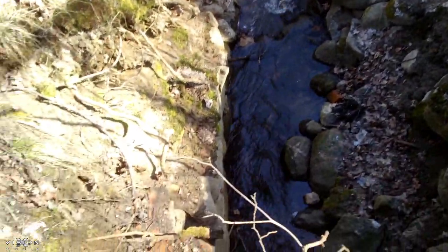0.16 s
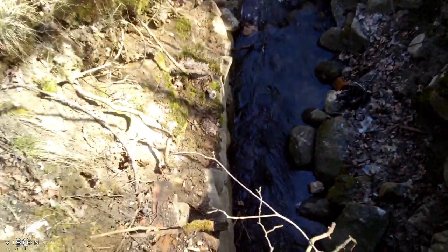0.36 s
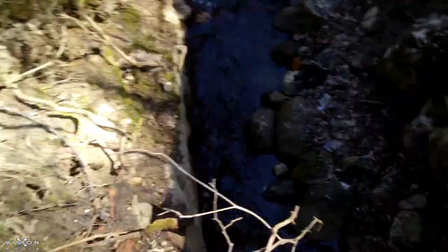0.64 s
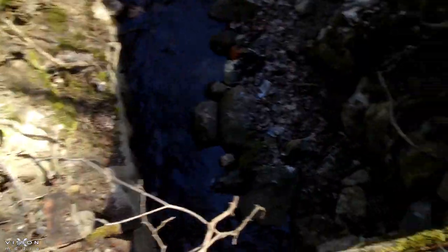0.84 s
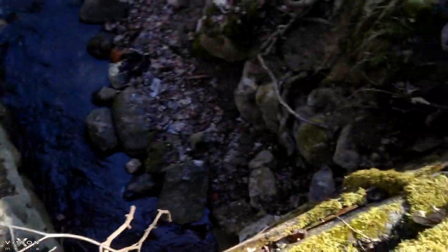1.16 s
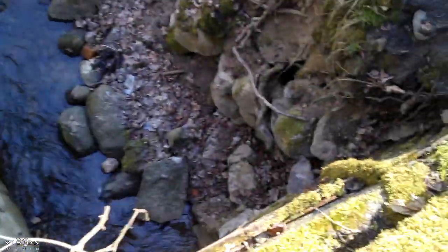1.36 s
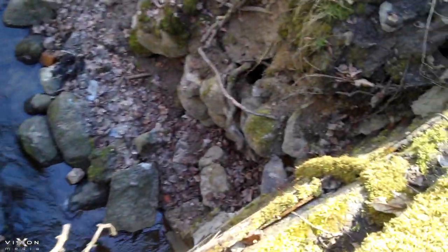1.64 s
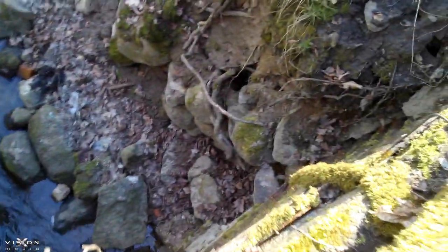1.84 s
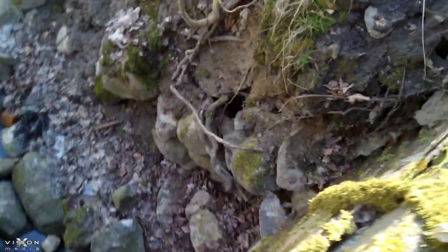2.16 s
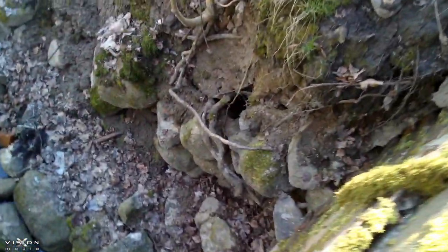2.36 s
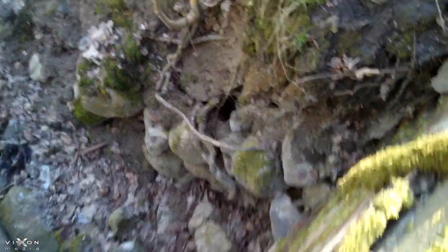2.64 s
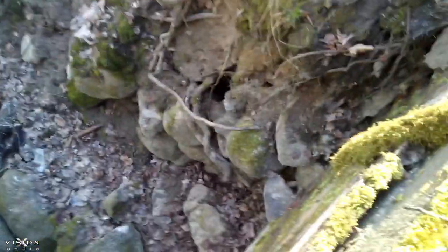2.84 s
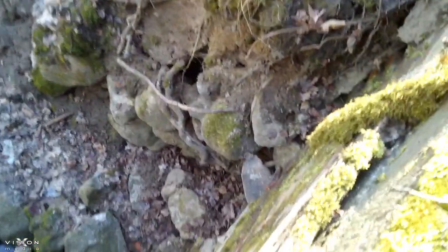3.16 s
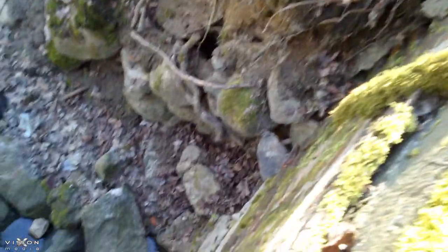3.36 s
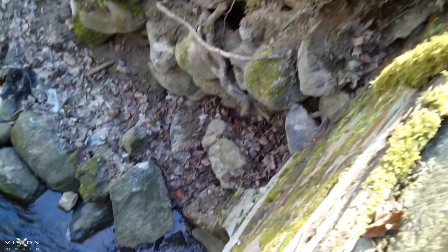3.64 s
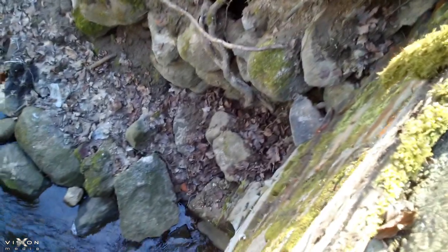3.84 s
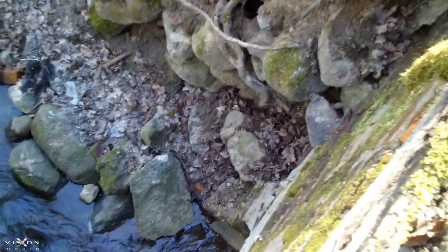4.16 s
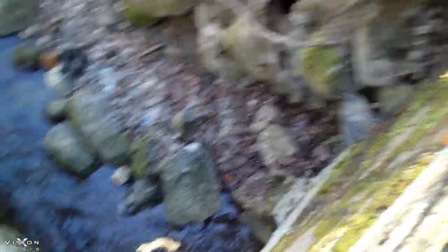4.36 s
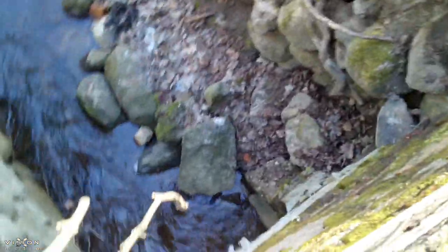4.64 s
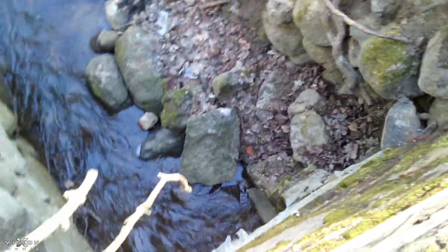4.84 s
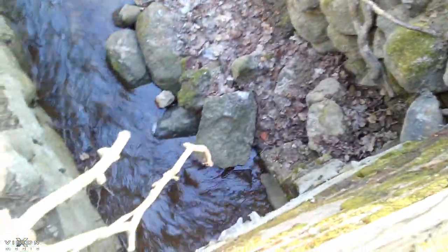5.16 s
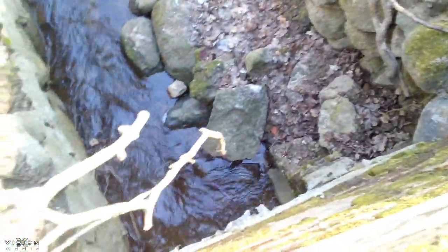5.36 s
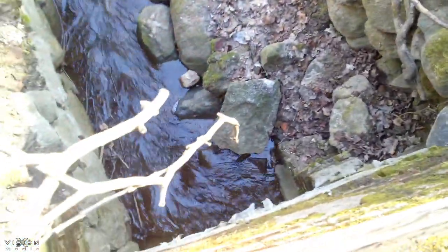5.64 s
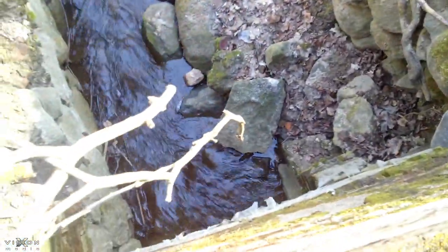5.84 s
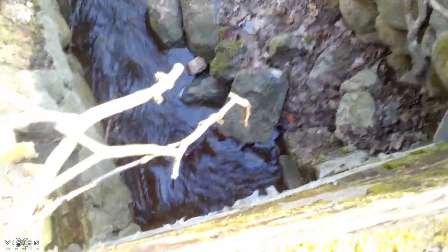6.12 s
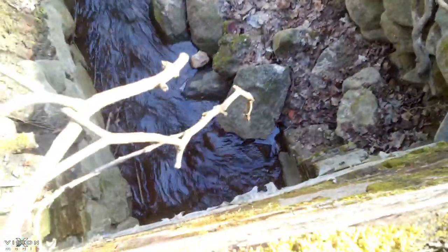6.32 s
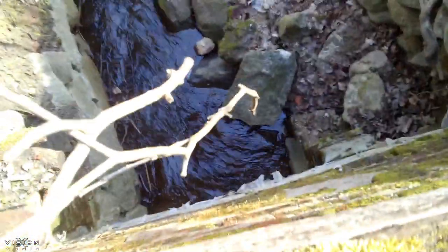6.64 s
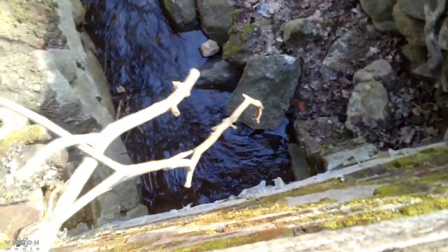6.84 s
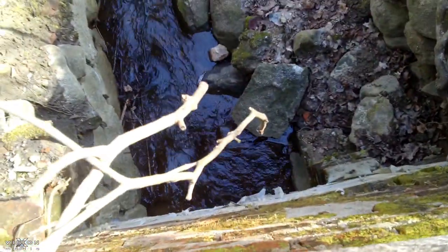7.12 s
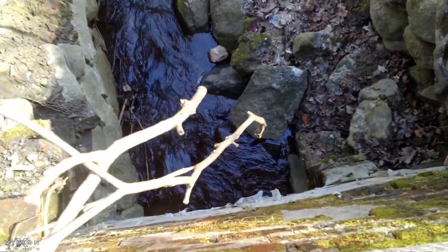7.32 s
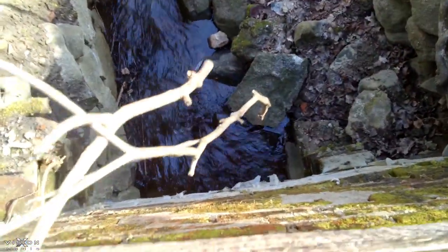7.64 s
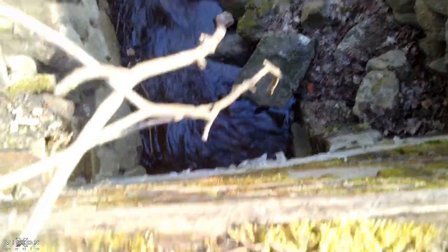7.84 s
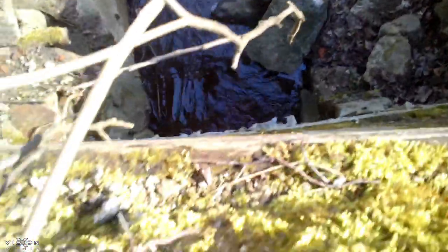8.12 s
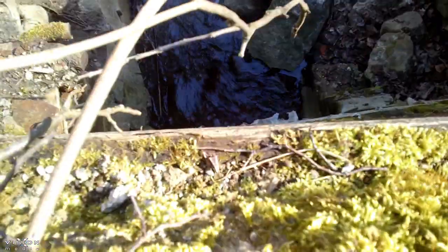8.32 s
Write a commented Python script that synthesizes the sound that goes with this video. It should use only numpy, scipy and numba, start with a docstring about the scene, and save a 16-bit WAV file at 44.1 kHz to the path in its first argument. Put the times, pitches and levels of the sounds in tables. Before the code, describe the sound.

A small brook babbles continuously over stones, heard close from above in a rocky gully with a faint, short echo. Thousands of small ringing bubbles blur into a bright midrange rush, dotted with clear plinks that rise in pitch. Around 0.7 seconds a wavelet slops with a rounder glug. From 1.7 to 2.7 the water is fuller and brighter, with fizzing spray surging strongest at 2.4 and sharp drops on stone. Low puffs of air and soft dull bumps touch the hand-held microphone near 1.5 and mostly from 2.8 to 3.8, strongest about 3.05. The flow thins between 4.5 and 5.2, quietest near 4.9, then returns by 5.5 with deeper hollow gurgles. At 6.55 a hard, dry click cracks out; the level dips briefly and recovers by about 6.95. Clear glugs sound near 7.2, 7.6 and 7.9; the babble swells near 7.75, eases at 8.1 and continues to the end at about 8.5.

```python
"""Small brook in a forest gully

A small brook runs over rocks, heard from the bank above it.
Bubbles in the riffle are thousands of dying sines; trickles add runs of clearer ones, over a blur of noise.
Tiny bubbles and noise make the spray fizz; large, low bubbles gurgle in a hollow between stones.
Puffs of low noise and soft, dull tones are air and bumps reaching the hand-held microphone.
There is one sharp click of short tones and noise, after which the level dips briefly."""
import sys
import numpy as np
from scipy import signal
from scipy.fft import rfft, irfft, next_fast_len
from scipy.io import wavfile
from numba import njit

SR = 44100
rng = np.random.default_rng(int(sys.argv[2]) if len(sys.argv) > 2 else 0)


def transcribe(u):
    """Save the signal u as a 16-bit wav file named by the first command-line argument.

    u: samples, shape (n,) or (channels, n), limited to [-1, 1]; the rate is SR.
    q: integer samples, one column per channel.
    """
    v = np.clip(np.atleast_2d(u).T, -1, 1)
    q = np.round(v * 32767).astype(np.int16)
    wavfile.write(sys.argv[1], SR, q)


N = 373968
TIME = np.arange(N) / SR

# flow of the riffle: t/s, babble level/dB,
# brightness/dB (added to the upper babble and the spray that follows it)
FLOW = [(0, -26.5, 5), (0.35, -27.5, 4.5), (0.75, -26, 4.5), (1.05, -27, 3), (1.6, -25, 3.0),
        (2.2, -24.5, 6.5), (2.9, -25.5, 7.5), (3.6, -25.5, 6), (4.25, -27, 7), (4.6, -32.5, 4.5),
        (4.78, -33, 1.5), (4.92, -38, 6.5), (5.17, -31, 2), (5.4, -26.5, 2.5), (5.95, -25.5, 2.5),
        (6.4, -28.5, 4.5), (7.2, -26, 2), (7.75, -24, 3.5), (8.12, -31, 8.5), (8.48, -27, 4)]
# the current is never even: each half of the babble wavers on its own
WAVER_DB, WAVER_PER_S = 0.92, 16
# a trickle's run of bubbles: typical gap, growth from one to the next, random pitch step
TRICKLE_GAP_S, TRICKLE_GROWTH_DB, TRICKLE_STEP_OCT = 0.011, 1, 0.1315
# wavelets slop over and trap big bubbles: t/s, level added to the lower babble/dB
SLOSHES = [(0.718, -22), (0.8, -22.5), (1.68, -43), (2.125, -25), (3.745, -19.5), (5.07, -42), (5.425, -25),
           (5.735, -25), (5.825, -23), (5.98, -23), (6.935, -42), (7.165, -26)]
SLOSH_RISE_S, SLOSH_HOLD_S, SLOSH_DECAY_S = 0.004, 0.011, 0.019
# waves break over a rock and throw spray: t/s, spray level/dB, decay/s
SURGES = [(0.548, -27, 0.067), (1.74, -35.5, 0.22), (1.88, -27, 0.097), (2.139, -23.5, 0.15),
          (2.407, -19.5, 0.21), (2.69, -27.5, 0.024)]
SURGE_RISE_S, SURGE_BABBLE_DB = 0.034, 6  # babble gain stirred up, relative to the surge's spray gain
SPRAY_SHARE_DB = -16.5  # steady spray gain, relative to the upper babble gain
# the hollow between stones: t/s, gurgle level/dB, burble level/dB
HOLLOW = [(0, -46, -36.5), (0.35, -56.5, -46.5), (0.65, -49, -39), (2.2, -47, -37.5), (3.3, -40.5, -39),
          (4.25, -48.5, -43), (4.48, -45.5, -54), (4.75, -60, -51), (5.3, -49.5, -42), (5.42, -42.5, -40),
          (5.7, -43.5, -35.5), (6.35, -40, -55), (6.5, -38.5, -42), (6.64, -47, -59), (6.78, -46, -50),
          (6.83, -42, -51), (7.1, -46.5, -47), (7.42, -50.5, -61), (7.56, -40.5, -53), (7.9, -40.5, -39),
          (8.48, -41.5, -48)]
# big air pockets in the hollow: t/s, level/dB, f/Hz
GLUGS = [(0.574, -15.5, 570), (0.724, -10.5, 930), (2.202, -22, 433), (3.196, -26.5, 320),
         (3.285, -23, 545), (3.344, -24.5, 566), (3.378, -30, 332), (4.511, -32, 350), (5.393, -32, 350),
         (5.418, -28, 315), (5.702, -26, 313), (5.737, -25, 357), (5.93, -21, 580), (5.968, -32, 342),
         (6.227, -16, 346), (6.462, -29, 365), (6.806, -28, 325), (6.931, -24, 360), (7.038, -27, 387),
         (7.236, -14, 780), (7.486, -37, 237), (7.531, -32, 400), (7.582, -11, 770), (7.693, -25, 356),
         (7.745, -23.5, 336), (7.899, -24, 362), (7.908, -12, 874), (7.97, -23, 389), (8.228, -26, 338)]
# ring time at this pitch; it shortens with this power of the pitch
GLUG_T60_S, GLUG_PITCH_HZ, GLUG_DAMPING = 0.095, 350, 1.1
# single near bubbles: t/s, level/dB, f/Hz, splash level relative to the table's bubble level/dB
PLINKS = [(0.2, -14, 1135, 11.5), (0.454, -11, 1900, -2), (0.484, -8, 3200, -1.5), (0.729, -10, 1027, -4),
          (0.735, -13, 1900, -3), (0.754, -10, 2800, -2), (0.875, -7, 2170, -7), (1.097, -9, 1500, 5),
          (1.18, -9.5, 2250, -3), (1.614, -7, 2570, -2), (1.695, -9, 1370, 0), (1.732, -1, 2210, -4),
          (1.857, -3.5, 2740, -6), (1.902, -6.5, 2100, -4), (2.018, -7, 1730, -8), (2.128, -5, 1760, 1),
          (2.182, 0, 2100, -2), (2.313, -3.5, 2350, -5), (2.787, -3, 1950, -3), (3.039, -2.5, 2420, -10),
          (3.131, -7, 2460, 5), (3.311, -6.5, 2100, -11), (3.359, -3, 2350, -4), (3.605, -4.5, 2070, -11),
          (3.754, -13.5, 970, 1), (3.847, -6, 1750, -3), (4.108, -10, 2720, -12), (4.271, -5.5, 1694, -17),
          (4.933, -19, 1870, -5), (5.077, -13, 1240, -3), (5.312, -12, 2540, -8), (5.347, -14.5, 996, 11),
          (5.435, -16.5, 1130, 6), (5.535, -12, 1800, -14), (5.691, -8, 1720, -3), (5.883, -12, 1740, 8.5),
          (5.997, -10, 1244, -6), (6.243, -9, 2770, -5), (6.427, -11, 2580, -6), (7.055, -8, 1650, 0),
          (7.174, -17, 1080, 10), (7.277, -11.5, 3090, -3), (7.355, -6.5, 1980, -2), (7.481, -10, 2850, -4),
          (7.505, -8.5, 1970, -5), (7.731, -5.5, 2300, -3), (7.776, -5, 2930, -11), (7.95, -8, 1630, -7),
          (8.136, -11, 2960, -20), (8.296, -13, 1130, -13), (8.369, -6, 1850, -1.5),
          (8.425, -12.5, 1800, -6)]
# drops slapping on stone: t/s, level/dB
DROPS = [(1.8563, -7), (2.145, -2), (2.4, -0.5), (5.4248, -10.5), (7.0555, -13.5), (7.498, -14),
         (7.8495, -11)]
# tones of the sharp click: t/s, level/dB, f/Hz, time to fall by 60 dB/s
CLICK = [(6.5463, 10.5, 2970, 0.0054), (6.5478, 10, 1950, 0.0088), (6.548, -3, 1020, 0.02),
         (6.548, -17, 620, 0.058), (6.549, -6, 5000, 0.012)]
# low rumble: t/s, level/dB
RUMBLING = [(0, -49), (0.45, -47), (1.05, -74), (1.5, -43.5), (1.9, -59), (2.35, -51), (2.6, -66),
            (2.95, -41.5), (3.8, -43), (4.7, -69.5), (5.2, -72.5), (5.6, -50), (6.1, -46), (7.0, -59),
            (7.5, -56), (7.85, -47.5), (8.25, -69), (8.48, -59)]
# gusts on the microphone: t/s, length/s, level/dB
GUSTS = [(1.475, 0.113, -31), (2.777, 0.033, -28), (2.887, 0.17, -27.5), (3.185, 0.15, -32),
         (3.346, 0.35, -34), (3.694, 0.12, -28.5), (3.818, 0.099, -37), (5.802, 0.02, -45),
         (5.9, 0.23, -49.5), (7.495, 0.037, -54)]
GUST_RISE_S, GUST_DECAY_S = 0.034, 0.028
LIGHT_AIR_DB = -10.5  # gain of the faint puffs, relative to the rumble curve
# soft bumps on the microphone: t/s, level/dB, f/Hz
BUMPS = [(1.52, -24, 150), (1.586, -22, 155), (2.797, -13, 192), (2.896, -15, 170), (2.947, -19.5, 173),
         (2.989, -11, 155), (3.046, -3, 185), (3.287, -27, 140), (3.464, -24, 124), (3.701, -23, 163),
         (3.759, -14.5, 149), (3.776, -15, 90), (5.791, -33, 99), (5.807, -19, 108)]
# how the microphone is turned: t/s, shaded f/Hz, lift of the top/dB
AIM = [(0, 5900, -3.5), (0.7, 4820, -2), (1.4, 5080, -2), (1.8, 4020, -1), (2.7, 3780, -1),
       (4.2, 3740, -2.5), (5.3, 4590, 4.5), (6.5, 4520, 2), (7.2, 4440, 2.5), (8.48, 5220, -0.5)]
# the level dips after the click
DIP_START_S, DIP_FALL_S, DIP_HOLD_S, DIP_RECOVER_S = 6.56, 0.08, 0.13, 0.18
DIP_DB = -8.5
CUTOFF_HZ = 6950
# colour of the riffle's babble: f/Hz, level/dB
BABBLE = [(380, -36.5), (600, -17.5), (780, -5), (1050, -3), (1450, -3), (1800, 0.74), (2300, 0),
          (2900, -3), (3400, -5.5), (3850, -8.5), (4250, -17.5), (4900, -33.5)]
# colour of the spray: f/Hz, level/dB
SPRAY = [(3000, -2.5), (3900, -10), (4900, -6), (5900, -9), (6600, -15), (7200, -38.5)]
# colour of the large bubbles in the hollow: f/Hz, level/dB
GURGLE = [(180, -8), (290, -3.5), (340, 4.5), (420, 4), (500, -12.5), (700, -33)]
# colour of the smaller bubbles in the hollow: f/Hz, level/dB
BURBLE = [(380, -3.5), (480, -7.5), (600, -5), (700, -6.5), (850, -33.5)]
# colour of the low rumble: f/Hz, level/dB
RUMBLE = [(15, -5), (40, -15), (68, 5.5), (90, -11), (140, -34.5), (300, -36.5)]
# colour of the puffs of air: f/Hz, level/dB
BUFFET = [(15, -13.5), (45, -7.5), (150, 3.5), (240, -2), (350, -13), (700, -42.5)]


def brook():
    """The flow drives babble and spray together; surges add to both, sloshes to the lower babble."""
    babble_db, bright_db = in_time(FLOW)
    lower = from_db(babble_db + WAVER_DB * drift(WAVER_PER_S))
    upper = from_db(babble_db + bright_db + WAVER_DB * drift(WAVER_PER_S))
    surge = surges()
    stirred = surge * from_db(SURGE_BABBLE_DB)
    churn = stirred ** 2 / (stirred ** 2 + upper ** 2)
    lower_extra = stirred * from_db(-bright_db) + sloshes()
    # hypot adds the powers of two gains
    babble = riffle(np.hypot(lower, lower_extra), np.hypot(upper, stirred), churn)
    fizz = spray(np.hypot(upper * from_db(SPRAY_SHARE_DB), surge))
    return babble + fizz + hollow(*in_time(HOLLOW)) + plinks() + drops()


def riffle(lower_gain, upper_gain, churn):
    """Ringing bubbles and slaps stand out of the blur of farther water; churning turns them to froth."""
    near = bubbles(per_s=2000, low_hz=500, high_hz=4445, cycles=33, loudness_db=2.6,
                   rise=0.098, onset_cycles=1.0, count=40000)
    runs = trickles(per_s=60, low_hz=1000, high_hz=3700, cycles=56, count=1200, size=4)
    ringing = coloured(near + from_db(-4) * runs, BABBLE)
    slaps = coloured(splashes(per_s=300, loudness_db=0.8, decay_s=0.0013, count=6000), BABBLE)
    far, froth = (coloured(white, BABBLE) for white in rng.standard_normal((2, N)))
    water = rms_one(ringing + from_db(-3.5) * slaps + from_db(-5.5) * far)
    water = np.sqrt(1 - churn) * water + np.sqrt(churn) * froth
    # big bubbles carry the lower babble, small ones the upper
    lower = signal.sosfiltfilt(signal.butter(3, 1600, fs=SR, output="sos"), water)
    upper = water - lower
    return lower_gain * from_db(0.3) * rms_one(lower) + upper_gain * from_db(-0.99) * rms_one(upper)


def trickles(per_s, low_hz, high_hz, cycles, count, size):
    """Threads of water shed linked runs of round, clear bubbles; rms 1."""
    when, chance, pitch = rng.random((count, 3)).T[:, :, None]
    gap, step, strength = rng.standard_normal((count, size, 3)).T.swapaxes(1, 2)
    s = when * N / SR + np.cumsum(TRICKLE_GAP_S * np.exp(0.5 * gap), axis=1)
    # the pitch wanders from each bubble to the next
    hz = low_hz * (high_hz / low_hz) ** pitch * 2 ** (TRICKLE_STEP_OCT * np.cumsum(step, axis=1))
    height = from_db(2 * strength + TRICKLE_GROWTH_DB * np.arange(size)) * np.sqrt(hz / low_hz)
    born = (chance < per_s * N / SR / count) & (s < N / SR)
    return rms_one(rings(s[born], height[born], hz[born], cycles / hz[born], 0.06, 3.5))


def sloshes():
    """Gain of the brief clusters of big bubbles trapped as wavelets slop over."""
    return sum(from_db(db) * swell(s, SLOSH_HOLD_S, SLOSH_RISE_S, SLOSH_DECAY_S) for s, db in SLOSHES)


def surges():
    """Gain of the spray thrown by breaking waves: each swells up and dies away."""
    return sum(from_db(db) * swell(s, 0, SURGE_RISE_S, decay_s) for s, db, decay_s in SURGES)


def spray(gain):
    """Tiny bursting bubbles fizz and droplets tick, blended with hiss."""
    fizz = bubbles(per_s=1900, low_hz=3146, high_hz=7170, cycles=97, loudness_db=4.5,
                   rise=0.023, onset_cycles=0.22, count=40000)
    ticks = splashes(per_s=110, loudness_db=2.8, decay_s=0.0009, count=2000)
    hiss = rng.standard_normal(N)
    mixed = fizz + from_db(2.0) * ticks + from_db(7.0) * hiss
    return gain * from_db(4.0) * coloured(mixed, SPRAY)


def hollow(gurgle_db, burble_db):
    """Large low bubbles gurgle between stones, smaller ones burble, now and then with a clear glug."""
    pockets = bubbles(per_s=115, low_hz=245, high_hz=460, cycles=32, loudness_db=1.4,
                      rise=0.11, onset_cycles=0.6, count=4000)
    smaller = bubbles(per_s=140, low_hz=413.0, high_hz=823, cycles=41, loudness_db=1.0,
                      rise=0.032, onset_cycles=0.9, count=6000)
    s, db, hz = columns(GLUGS)
    t60 = GLUG_T60_S * (GLUG_PITCH_HZ / hz) ** GLUG_DAMPING
    glugs = rings(s, from_db(db + 8.0), hz, t60, 0.17, 3.9)
    gurgle = from_db(gurgle_db + 2.5) * coloured(pockets, GURGLE)
    burble = from_db(burble_db + 0.1) * coloured(smaller, BURBLE)
    return gurgle + burble + glugs


def plinks():
    """A drop lands close by with a small splash and traps a bubble, which rises in pitch."""
    s, db, hz, splash_db = columns(PLINKS)
    splash = band(bursts(s, from_db(db + splash_db), 0.002), [1100, 3200], "band", order=4)
    return splash + rings(s, from_db(db + 3.5), hz, 55 / hz, 0.04, 3.0)


def drops():
    """Each drop on stone is a very short bright splat of noise."""
    s, db = columns(DROPS)
    return band(bursts(s, from_db(db), 0.0011), [4200, 6400], "band", order=3)


def click():
    """A hard tick of short tones with a broad crack and a short scuff around it."""
    s, db, hz, t60 = columns(CLICK)
    grit = rms_one(band(rng.standard_normal(N), [400, 5500], "band", order=2))
    scuff = from_db(-21.0) * swell(s[1], 0, rise_s=0.003, decay_s=0.0076)
    crack = from_db(-9.0) * swell(s[0], 0, rise_s=0.0004, decay_s=0.0018)
    return rings(s, from_db(db), hz, t60, 0.0, 1.0) + (scuff + crack) * grit


def microphone_air(rumble_db):
    """Moving air makes a low rumble and lumpy puffs of noise; bumps are short, dull tones."""
    rumble = from_db(rumble_db + 1.5) * coloured(rng.standard_normal(N), RUMBLE)
    each_gust = [from_db(db) * swell(s, length, GUST_RISE_S, GUST_DECAY_S) for s, length, db in GUSTS]
    gusts = np.max(each_gust, axis=0)
    strength = np.hypot(gusts, from_db(rumble_db + LIGHT_AIR_DB))
    lumps = from_db(2.3 * drift(45))
    puffs = strength * from_db(-2.5) * coloured(rng.standard_normal(N) * lumps, BUFFET)
    s, db, hz = columns(BUMPS)
    bumps = rings(s, from_db(db + 4.0), hz, 4.5 / hz, 0.0, 0.4)
    return rumble + puffs + bumps


def gully(x):
    """The rocky banks send back a faint, short wash of echoes."""
    t = TIME[:SR // 3]
    # random echoes start after 6 ms and fall by 60 dB every 0.14 s
    echoes = rng.standard_normal(len(t)) * from_db(-60 * t / 0.14) * (t > 0.006)
    return x + from_db(-20) * signal.fftconvolve(x, echoes / np.linalg.norm(echoes))[:N]


def turned(x, notch_hz, lift_db):
    """A near reflection weakens a treble band, which slides as the microphone turns; the top shifts too."""
    hz, s, frames = signal.stft(x, SR, nperseg=512)
    notch, lift = np.interp(s, TIME, notch_hz), np.interp(s, TIME, lift_db)
    notch_db = -6.5 * np.exp(-((hz[:, None] - notch) / 430) ** 2)
    top_db = lift * np.interp(hz, [4500, 5800], [0, 1])[:, None]
    return signal.istft(frames * from_db(notch_db + top_db), SR, nperseg=512)[1][:N]


def dip():
    """Gain that falls, stays low and recovers."""
    corners = np.cumsum([DIP_START_S, DIP_FALL_S, DIP_HOLD_S, DIP_RECOVER_S])
    return from_db(DIP_DB * np.interp(TIME, corners, [0, 1, 1, 0]))


def bubbles(per_s, low_hz, high_hz, cycles, loudness_db, rise, onset_cycles, count):
    """Bubbles born at random, many faint and few loud, with an even spectrum; rms 1."""
    when, chance, pitch, size, damping = rng.random((count, 5)).T
    born = chance < per_s * N / SR / count
    hz = low_hz * (high_hz / low_hz) ** pitch
    loudness = np.minimum(-np.log(1 - size), 3.2)
    # high bubbles die sooner, so they need more height for the same power per Hz
    height = from_db(loudness_db * loudness) * hz / low_hz
    t60 = cycles / hz * 2 ** (2 * damping - 1)
    return rms_one(rings(when[born] * N / SR, height[born], hz[born], t60[born], rise, onset_cycles))


@njit
def rings(start, height, hz, t60, rise, onset_cycles):
    """Sum of dying sines; each builds up over some cycles and climbs by the share `rise` while it lasts."""
    out = np.zeros(N)
    for k in range(len(start)):
        first = int(start[k] * SR)
        fade = np.exp(-np.log(1000) / (t60[k] * SR))
        build = np.exp(-hz[k] / (onset_cycles * SR))
        size, lack = height[k], 1.0
        for i in range(min(int(t60[k] * SR), N - first)):
            t = i / SR
            cycles = hz[k] * t * (1 + rise * t / (2 * t60[k]))
            out[first + i] += size * (1 - lack) * np.sin(2 * np.pi * cycles)
            size *= fade
            lack *= build
    return out


def splashes(per_s, loudness_db, decay_s, count):
    """Random short noise bursts, each a slap or a brief cloud of tiny drops; rms 1."""
    when, chance, size = rng.random((count, 3)).T
    born = chance < per_s * N / SR / count
    loudness = np.minimum(-np.log(1 - size), 3.6)
    return rms_one(bursts(when[born] * N / SR, from_db(loudness_db * loudness[born]), decay_s))


def bursts(start, height, decay_s):
    """White noise that flares up at each start and dies quickly."""
    kicks = np.bincount((start * SR).astype(int), height ** 2, N)[:N]
    r = np.exp(-2 / (decay_s * SR))
    power = signal.lfilter([(1 - r) * np.e], [1, -2 * r, r * r], kicks + 1e-18)
    return np.sqrt(np.abs(power)) * rng.standard_normal(N)


def swell(start, hold_s, rise_s, decay_s):
    """A gain that grows to 1 at the start, holds and dies away."""
    before = np.maximum(start - TIME, 0)
    after = np.maximum(TIME - start - hold_s, 0)
    return np.exp(-before / rise_s - after / decay_s)


def drift(rate):
    """Slow random wandering with spread 1, from smoothed noise at every 40th sample."""
    r = np.exp(-80 * np.pi * rate / SR)
    slow = signal.lfilter([1], [1, -2 * r, r * r], rng.standard_normal(N // 40 + 2002))[2000:]
    return np.interp(np.arange(N) / 40, np.arange(len(slow)), rms_one(slow))


def coloured(x, points):
    """Filter a sound with a smooth colour curve, silent outside it; rms 1."""
    hz, db = columns(points)
    size = next_fast_len(N)
    bins = np.maximum(np.fft.rfftfreq(size, 1 / SR), 1)
    gain = from_db(np.interp(np.log(bins), np.log(hz), db, left=-np.inf, right=-np.inf))
    return rms_one(irfft(rfft(x, size) * gain, size)[:N])


def band(x, hz, kind, order=2):
    """Filter that passes only part of the spectrum (Butterworth)."""
    return signal.sosfilt(signal.butter(order, hz, kind, fs=SR, output="sos"), x + 1e-18)


def columns(table):
    """The columns of a table as separate arrays."""
    return np.transpose(table).astype(float).copy(order="C")


def in_time(rows):
    """Each column of a curve at every sample."""
    s, *curves = columns(rows)
    return [np.interp(TIME, s, curve) for curve in curves]


def from_db(db):
    """Decibels to gain."""
    return 10 ** (np.asarray(db) / 20)


def rms_one(x):
    """Scale to unit power."""
    return x / np.sqrt(np.mean(x ** 2) + 1e-20)


def scene():
    """The brook in its gully, and what touches the microphone; the dip spares only the click."""
    water = turned(gully(brook()), *in_time(AIM))
    air = microphone_air(*in_time(RUMBLING))
    return (dip() * (water + air) + click())[None]


def record(dry):
    """Peaks are rounded and the top is cut steeply."""
    rounded = 0.97 * np.tanh(dry / 1.374)
    return signal.sosfiltfilt(signal.butter(20, CUTOFF_HZ, fs=SR, output="sos"), rounded)


dry = scene()
out = record(dry)
transcribe(out)
```